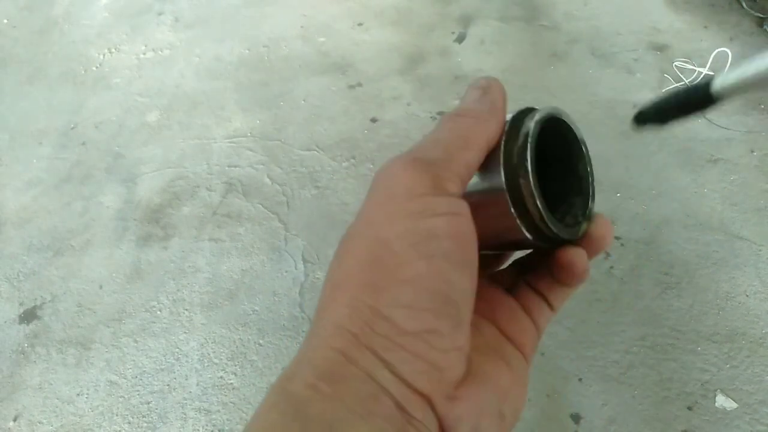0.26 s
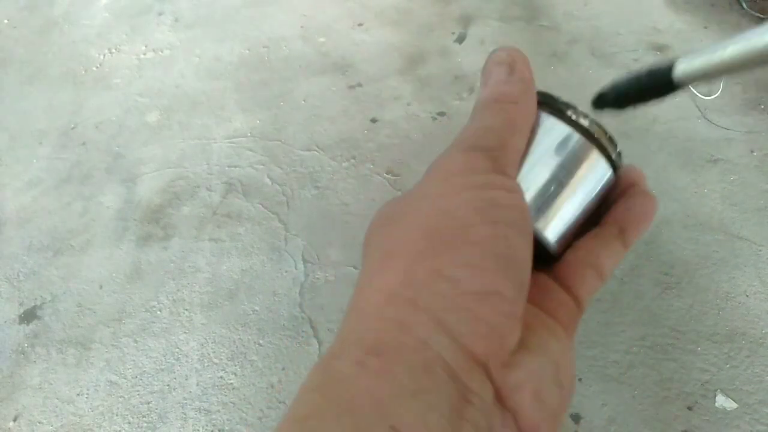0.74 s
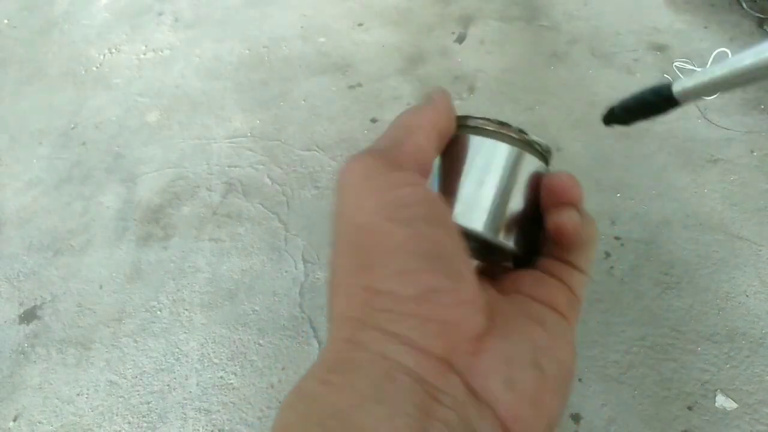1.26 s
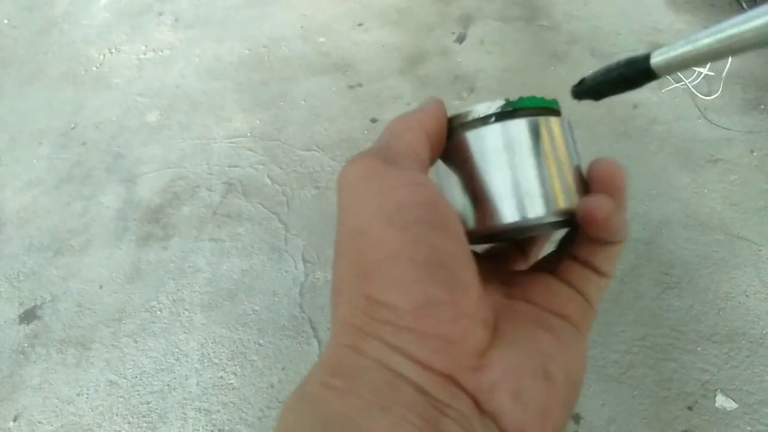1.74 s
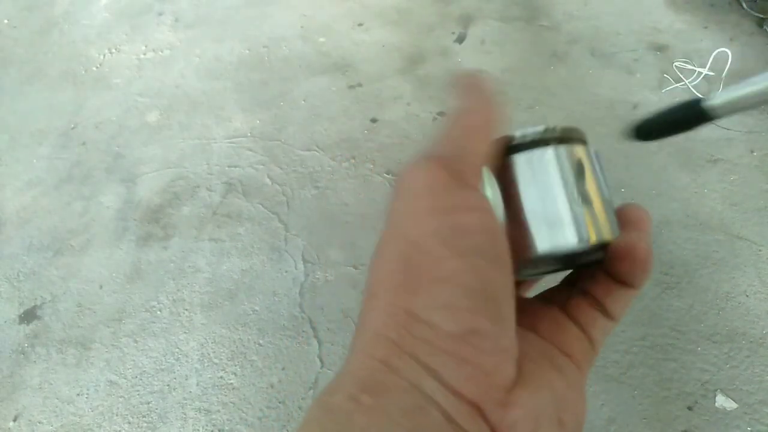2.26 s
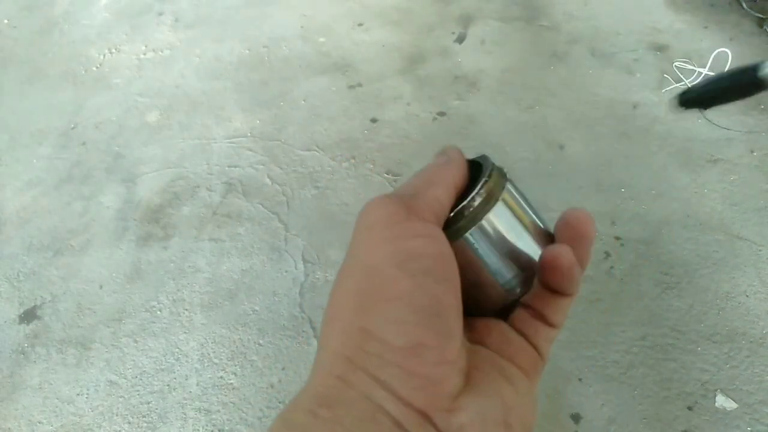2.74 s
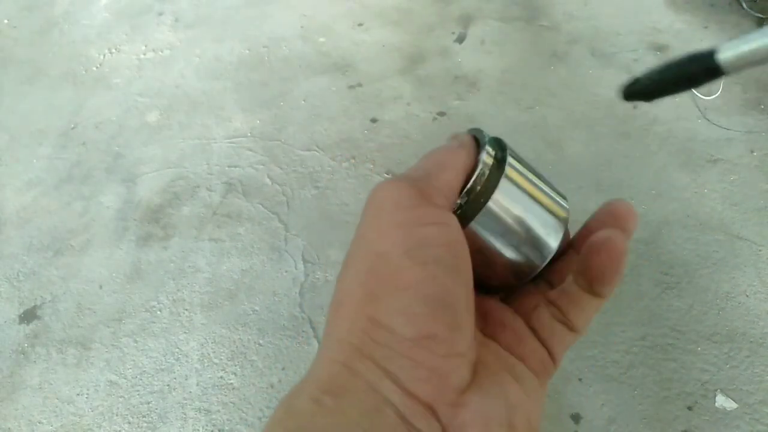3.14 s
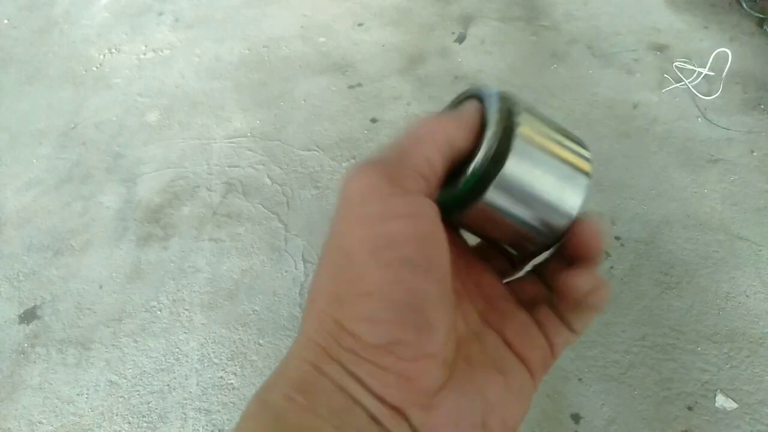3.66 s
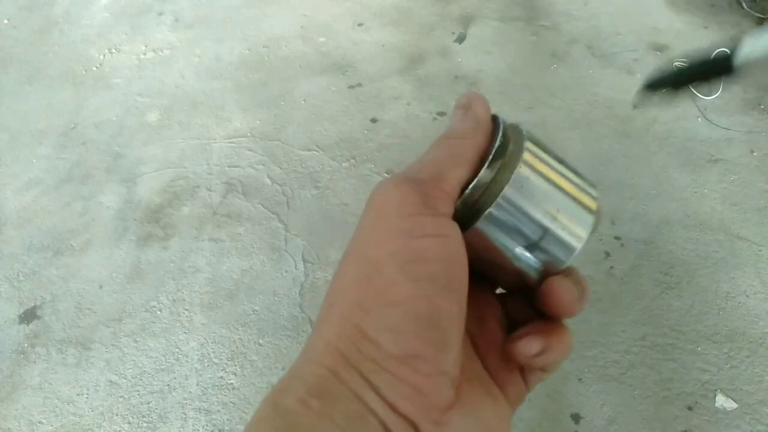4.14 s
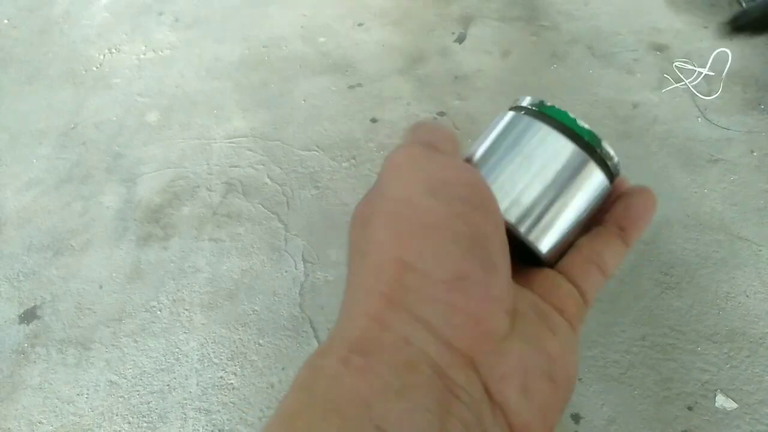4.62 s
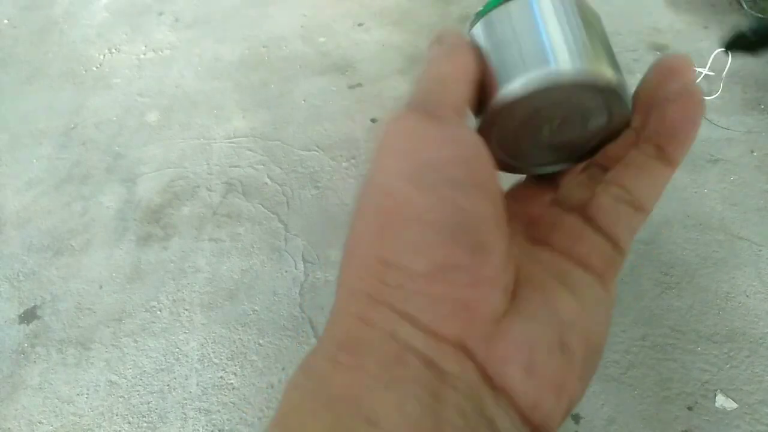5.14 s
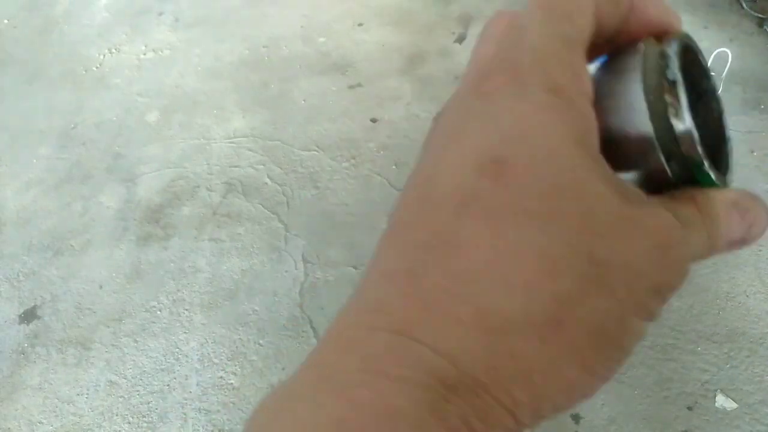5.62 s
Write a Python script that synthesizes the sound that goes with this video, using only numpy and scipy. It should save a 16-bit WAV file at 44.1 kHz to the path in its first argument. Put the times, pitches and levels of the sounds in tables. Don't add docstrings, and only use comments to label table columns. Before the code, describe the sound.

Very close to a small camera microphone, an air blow gun fires eight bursts at a hollow steel part. Each snaps on into a loud, dense roar with piercing hiss, then stops abruptly. In the short gaps there is only a faint breathy leak and small hoots. The second burst is longest; later ones get shorter. Dry, no noticeable echo.

```python
import sys
import numpy as np
from scipy import signal
from scipy.fft import rfft, irfft, next_fast_len
from scipy.io import wavfile
from scipy.ndimage import uniform_filter1d, map_coordinates

SR = 44100
rng = np.random.default_rng(int(sys.argv[2]) if len(sys.argv) > 2 else 0)


def log_audio(samples):
    frames = np.atleast_2d(samples).T
    limited = np.clip(frames, -1, 1)
    pcm = np.round(limited * 32767).astype(np.int16)
    wavfile.write(sys.argv[1], SR, pcm)


def volts_from_db(level):
    exponent = np.asarray(level, float) / 20
    return 10 ** exponent


N = 259308

# valve opens t/s, valve shut t/s, rise/s, fall/s, air spilled at the microphone level/dB
PULLS = [
    (0.062, 0.707, 0.032, 0.031, -1.5),
    (.775, 2.345, 0.019, 0.047, -1),
    (2.455, 3.232, 0.06, 0.033, 1),
    (3.339, 3.709, 0.047, 0.072, -1),
    (3.853, 4.517, 0.066, 0.061, 1),
    (4.627, 5.086, 0.04, 0.038, 1.5),
    (5.204, 5.363, 0.042, 0.026, -2),
    (5.451, 5.896, 0.049, 0.042, -3),
]
# t/s, jet squarely on the part level/dB, lip facing the microphone level/dB, jet on sharp rim level/dB
AIM = [(0, 0.5, 4.5, 1), (.6, -1, 4, 0.5), (.69, 1, -5, -0.5), (.8, -7, 0, 0), (.87, -4.5, 8.5, 0),
       (.98, -8.5, 3.5, -1), (1.15, -6.5, 1.5, 0), (1.3, 0, 4.5, 0.5), (2.12, -1, 4.5, 1),
       (2.28, 0.5, 0, -0.5), (2.55, -0.5, 2, 0.5), (3.1, 1.5, 2, 0), (3.4, 2, 1.5, 0), (4.15, 1, 2.5, -0.5),
       (4.9, 2, 1, 0.5), (5.25, -1.5, -0.5, -0.5), (5.53, -1.5, 0, 2), (5.88, -0.5, 3.5, 0.5)]
# t/s, length/s, blow on the part level/dB, ring of the nozzle level/dB
SWEEPS = [(.215, 0.0073, -9, -7.5), (.365, 0.015, -1.5, 10), (.405, 0.022, -4, -10), (.84, .018, -1, -8),
          (.9, .03, 8, 9), (1.05, 0.035, 5.5, 4), (1.165, .015, 3, 7), (1.785, 0.023, -4, -6),
          (1.91, 0.082, -0.5, -7), (2.2, 0.029, -4, -9), (2.285, 0.016, -11, -14), (2.312, .012, 10.5, 8),
          (2.56, 0.025, 1.5, 3), (2.78, 0.013, 0, -15), (3.165, 0.016, 0.5, 4), (3.46, 0.022, -2, -10),
          (3.5, 0.029, -0.5, 7), (4.24, 0.012, -0.5, 7), (4.1, 0.031, 3.5, 8), (4.2, 0.051, -4, -1.5),
          (4.28, 0.05, 3.5, 1.5), (4.465, 0.021, -6, -25), (4.715, .02, 1, -14), (5.03, 0.02, 0.5, 1),
          (5.325, .02, 2.5, 5), (5.605, 0.034, 3.5, 9), (5.675, 0.035, 0, -3), (5.75, 0.045, 2, 8.5),
          (5.79, 0.019, -1, -4), (5.855, 0.015, 3, 7)]
# f/Hz, density level/dB per Hz
JET_SPECTRUM = [(100, -13.5), (180, -5), (345, -6), (837, 0), (1890, -2), (3800, -11), (5800, -16.5),
                (9000, -20)]
# f/Hz, density level/dB per Hz
NOZZLE_SPECTRUM = [(5000, -32), (6300, -7), (6900, -1), (7300, 0), (7900, -2), (8600, -15), (10000, -17)]
# f/Hz, density level/dB per Hz
LIP_SPECTRUM = [(5000, -15), (8500, -11), (11400, -11), (13000, -7.5), (14500, -3.5), (15300, -.5),
                (15700, 2.5)]
# t/s, length/s, f/Hz,
# level/dB
HOOTS = [
    (.672, 0.021, 1610, -28),
    (.765, 0.036, 1840, -42),
    (.77, 0.035, 1300, -42),
    (.665, 0.013, 1220, -33),
    (2.56, 0.045, 1540, -34),
    (3.55, .07, 1300, -37),
    (4.0, 0.1, 1360, -34),
    (4.3, 0.062, 1510, -30),
    (4.67, 0.039, 1510, -34),
]
# t/s, length/s, f/Hz, level/dB
SQUEAKS = [
    (.02, 0.016, 10050, -51),
    (.078, 0.0042, 7700, -43),
    (.672, 0.02, 4970, -45),
    (0.672, .025, 10900, -50),
    (.79, .012, 10900, -48),
    (2.48, .012, 9800, -44),
    (3.872, .016, 11000, -50),
    (4.642, 0.0086, 3880, -40),
    (5.222, .012, 11000, -53),
    (5.469, .008, 7400, -39),
]
# strongest t/s, seat level/dB, barrel level/dB, barrel f/Hz, glide/Hz per s
LEAKS = [
    (-.01, -46, -71, 1440, -500),
    (0.751, -45.5, -35.5, 1502, -1200),
    (2.39, -46.5, -46, 1520, -300),
    (3.275, -44, -39.5, 1250, -1200),
    (3.76, -47.5, -45, 1296, 59),
    (4.572, -48, -48.5, 1437, 302),
    (5.139, -46, -49, 1528, -500),
    (5.41, -45.5, -42.5, 1560, 600),
]
# f/Hz, density level/dB per Hz
SEAT_SPECTRUM = [(60, -43), (145, -33), (500, -27), (680, -15.5), (900, -17), (1300, -9), (1850, -10),
                 (4190, -15), (4680, -14.5), (5470, -18.5), (7130, -9.5), (9710, -23.5), (12500, -25.5),
                 (15700, -19)]
# t/s, peak level/dB, ring f/Hz
TICKS = [
    (2.413, -33, 9500),
    (5.1738, -33.5, 9870),
]
# t/s, length/s, level/dB
GUSTS = [(.23, .04, 8), (.35, 0.039, 8), (.66, .04, 8), (.8, 0.066, 11), (1.15, .06, 8), (2.74, .04, 6),
         (3.12, 0.042, 1), (4.0, 0.046, 8), (4.12, .04, -6), (4.27, .05, 4), (4.46, .03, 11),
         (4.82, .05, 7), (5.3, .04, 15), (5.49, .025, 9), (5.85, 0.027, 13)]
# t/s, peak level/dB
PUSHES = [
    (.75, -43),
    (2.385, -50),
    (2.41, -46),
    (3.27, -54),
    (3.745, -48),
    (5.4, -49),
]
# f/Hz, density level/dB per Hz
THUMP_SPECTRUM = [(8, 5), (25, -6), (45, -11), (75, -16), (120, -44)]
# f/Hz, density level/dB per Hz
FLUTTER_SPECTRUM = [(50, -26), (95, -15.5), (130, -1), (180, -4.5), (260, -12.5)]
UNLINKED = [.286, .495, .588, 1.215, 1.587, 1.773, 1.935, 1.982, 2.167, 2.376, 2.539, 2.817, 3.003, 3.026,
            3.723, 4.071, 4.304, 4.721, 5.557]

ROAR_DB, RUSH_DB, NOZZLE_DB, LIP_DB = -34, -32, -43.5, -31.5
SHUT_DB, BEND, QUICK_BEND = -29, 1.63, 3.6
SPIT_DB, SPIT_DELAY_S, SPIT_S = 8.5, 0.018, 0.0074
SWAY_DB, NOZZLE_SWAY_DB, LUMPS_DB = 0.4, 0.8, 2.2
BUILD_DB_PER_S, SAG_DB_PER_S = 139, 100
HISS_DB, HISS_SAG_DB_PER_S = -49, 170
THUMP_DB, FLUTTER_DB = -58, -47.5
LEAD_S = 0.007


def jet():
    opening, gate = valve()
    flow_db = SHUT_DB * (1 - opening) ** BEND
    quick_db = SHUT_DB * (1 - opening) ** QUICK_BEND
    aim_db, facing_db, graze_db = curves(AIM)
    blow_db, ring_db = swells(SWEEPS)
    spit_db, = swells([(on + SPIT_DELAY_S, SPIT_S, SPIT_DB) for on, *_ in PULLS])

    roar_db = ROAR_DB + 0.89 * flow_db + aim_db + blow_db
    rush_db = RUSH_DB + 0.73 * flow_db + 0.52 * aim_db + 0.31 * blow_db + 0.18 * ring_db + graze_db
    nozzle_db = NOZZLE_DB + 0.38 * quick_db + 1.3 * aim_db + ring_db + spit_db + 1.5 * graze_db
    lip_db = LIP_DB + 0.15 * spit_db + 1.1 * quick_db + facing_db + 0.15 * blow_db
    shear_db = 0.4 * rush_db + 0.5 * lip_db - 4.0

    big, small, sway = wobble(70), wobble(400), wobble(11)
    roar = turbulence(JET_SPECTRUM, 30, 1036, patchy_db=0.27, eddies_db=1.0 * big + 0.8 * small)
    rush = turbulence(JET_SPECTRUM, 1100, 11300, patchy_db=0.47, eddies_db=0.68 * big + 0.53 * small)
    nozzle = turbulence(NOZZLE_SPECTRUM, 3000, 30000, patchy_db=1.5, eddies_db=0.88 * big)
    shear = turbulence(LIP_SPECTRUM, 5400, 17400, patchy_db=2.0, eddies_db=0.83 * big)
    lip = turbulence(LIP_SPECTRUM, 12500, 90000, patchy_db=1.2, eddies_db=0.5 * big)

    on_part = volts_from_db(roar_db + SWAY_DB * sway) * roar + volts_from_db(rush_db + SWAY_DB * sway) * rush
    at_nozzle = volts_from_db(nozzle_db + NOZZLE_SWAY_DB * sway) * nozzle + volts_from_db(lip_db + 0.35 * sway) * lip
    return gate * (on_part + at_nozzle + volts_from_db(shear_db + 0.3 * sway) * shear)


def valve():
    t = np.arange(N) / SR
    opening = np.zeros(N)
    for on, off, rise, fall, _ in PULLS:
        opening += np.clip(np.minimum((t - on) / rise, (off - t) / fall), 0, 1)
    return opening, uniform_filter1d(1.0 * (opening > 0), round(0.029 * SR))


def squeaks():
    return whistles(SQUEAKS, width_hz=130) + whistles(HOOTS, width_hz=180)


def whistles(rows, width_hz):
    t, out = np.arange(N) / SR, np.zeros(N)
    for s, length, hz, db in rows:
        narrow = unit(filtered(rng.standard_normal(N), lambda f: 1 / (1 + ((f - hz) / width_hz) ** 2)))
        out += volts_from_db(db) * np.exp(-2 * ((t - s) / length) ** 4) * narrow
    return out


def leak():
    t, gate = np.arange(N) / SR, 1 - valve()[0]
    pause = np.searchsorted([(on + off) / 2 for on, off, *_ in PULLS[:-1]], t)
    peak_s, seat_db, barrel_db, barrel_hz, glide = np.transpose(LEAKS)[:, pause]
    early, late = np.maximum(peak_s - t, 0), np.maximum(t - peak_s, 0)
    pressure_db = -BUILD_DB_PER_S * early - SAG_DB_PER_S * late
    seat_db = seat_db + pressure_db
    barrel_db = barrel_db + 0.75 * pressure_db
    hiss_db = HISS_DB - HISS_SAG_DB_PER_S * late

    barrel_hz = barrel_hz + glide * np.clip(t - peak_s, -0.1, 0.1)
    turn = 2 * np.pi * np.cumsum(barrel_hz) / SR
    breathy = lambda: filtered(rng.standard_normal(N), lambda hz: 1 / (1 + (hz / 165) ** 3))
    barrel = unit(breathy() * np.cos(turn) + breathy() * np.sin(turn))

    seat = turbulence(SEAT_SPECTRUM, 60, 8600, patchy_db=1.5, eddies_db=0.17 * wobble(48))
    hiss = turbulence(SEAT_SPECTRUM, 8400, 30000, patchy_db=0.8, eddies_db=0.4 * wobble(60))
    return gate * (volts_from_db(barrel_db + 1.0) * barrel + volts_from_db(seat_db + 6.0) * seat + volts_from_db(hiss_db + 7) * hiss)


def trigger():
    out, t = np.zeros(N), np.arange(400) / SR
    for s, db, hz in TICKS:
        ring = volts_from_db(-60 * t / 0.0055) * (1 - np.exp(-t / 0.00034)) * np.sin(2 * np.pi * hz * t)
        grit = np.convolve(rng.standard_normal(len(t)), [1, 1, 0, -1, -1], "same")
        crack = 0.12 * volts_from_db(-60 * t / 0.003) * grit
        out[round(s * SR):][:len(t)] += volts_from_db(db + 13.0) * (ring + crack)
    return out


def buffet():
    t = np.arange(N) / SR
    opening, running = valve()
    aim_db, facing_db, _ = curves(AIM)
    gust_db, = swells(GUSTS)
    blow_db = swells(SWEEPS)[0]
    calm = np.interp(t + LEAD_S, t, uniform_filter1d(1 - opening, round(0.02 * SR)))
    pull = np.searchsorted([off for _, off, *_ in PULLS], t - 0.05)
    spill_db = np.transpose(PULLS)[-1, pull]

    thump_db = THUMP_DB - 12 * calm + 0.4 * spill_db + gust_db
    flutter_db = FLUTTER_DB - 17 * calm + spill_db + 0.82 * aim_db - 0.8 * facing_db
    flutter_db = flutter_db + 0.49 * gust_db * (1 - calm) + 0.5 * blow_db
    thump = turbulence(THUMP_SPECTRUM, 5, 200, patchy_db=3.0, eddies_db=1.5 * wobble(12))
    flutter = turbulence(FLUTTER_SPECTRUM, 30, 390, patchy_db=1.7, eddies_db=LUMPS_DB * wobble(25))
    flutter_gate = 0.3 + 0.68 * np.interp(t + LEAD_S, t, running)

    jolts = np.zeros(N)
    for s, db in PUSHES:
        jolts += volts_from_db(db) * np.exp(-((t - s) / 0.012) ** 2) * np.sin(2 * np.pi * 33 * (t - s))
    return volts_from_db(thump_db + 0.5) * thump + flutter_gate * volts_from_db(flutter_db + 2.86) * flutter + jolts


def turbulence(spectrum, lo_hz, hi_hz, patchy_db, eddies_db):
    z = signal.stft(rng.standard_normal(N) * volts_from_db(eddies_db), nperseg=512)[2]
    field = uniform_filter1d(uniform_filter1d(rng.standard_normal(z.shape), 6, 0), 8, 1)
    x = signal.istft(z * volts_from_db(patchy_db * unit(field)), nperseg=512)[1][:N]

    def response(hz):
        region = hz ** 6 / (hz ** 6 + lo_hz ** 6) / (1 + (hz / hi_hz) ** 6)
        return volts_from_db(along(spectrum, hz)) * np.sqrt(region)

    return unit(filtered(x, response))


def unit(x):
    return x / np.sqrt(np.mean(x ** 2) + 1e-20)


def along(points, hz):
    f, v = np.transpose(points)
    return np.interp(np.log(hz + 1), np.log(f + 1), v)


def curves(rows):
    s, *cols = np.transpose(rows)
    return [np.interp(np.arange(N) / SR, s, c) for c in cols]


def swells(rows):
    s, length, *cols = np.transpose(rows)
    bells = np.exp(-((np.arange(N) / SR - s[:, None]) / length[:, None]) ** 2)
    return np.array(cols) @ bells


def wobble(rate):
    knots = rng.standard_normal(int(N * rate / SR) + 4)
    return map_coordinates(knots, [np.arange(N) * rate / SR])


def filtered(x, response):
    m = next_fast_len(N + 8192)
    return irfft(rfft(x, m) * response(np.fft.rfftfreq(m, 1 / SR)), m)[..., :N]


def scene():
    return np.tile(jet() + leak() + squeaks() + trigger() + buffet(), (2, 1))


def unlink(x):
    mid, side = x[0].copy(), np.zeros(N)
    half, offset = 1024, 345
    window = signal.windows.kaiser_bessel_derived(2 * half, 4 * np.pi)
    phase_steps = np.arange(2 * half) + 0.5 + half / 2
    lows = rng.uniform(4000, 13800, (len(UNLINKED), 2))
    for s, lo_hz in zip(np.repeat(UNLINKED, 2), lows.ravel()):
        hi_hz = lo_hz + 1450
        start = offset + half * (round((s * SR - offset) / half) - 1)
        moment = slice(start, start + 2 * half)
        bins = np.arange(*np.round(np.array([lo_hz, hi_hz]) * 2 * half / SR)) + 0.5
        waves = window * np.cos(np.pi / half * np.outer(bins, phase_steps)) * np.sqrt(2 / half)
        sizes = waves @ x[0][moment]
        mid[moment] -= 0.19 * sizes @ waves
        side[moment] += 0.63 * rng.permutation(sizes) @ waves
    return np.array([mid + side, mid - side])


def band_limit(x):
    return signal.sosfilt(signal.butter(12, 17110, fs=SR, output="sos"), x)


def record(dry):
    limited = filtered(dry, lambda hz: hz < 15730)
    return band_limit(unlink(limited))


dry = scene()
out = record(dry)
log_audio(out)
```